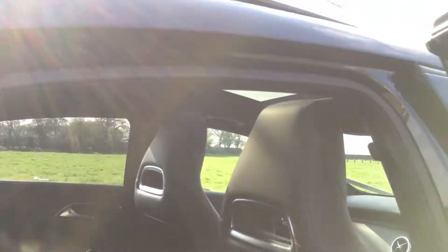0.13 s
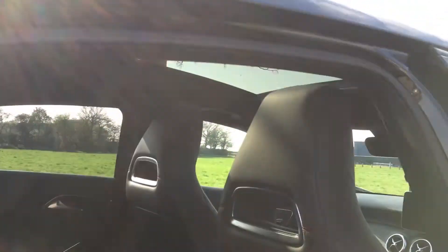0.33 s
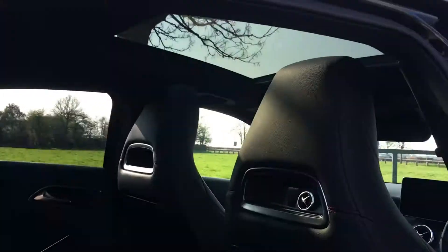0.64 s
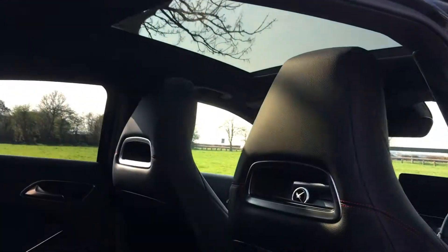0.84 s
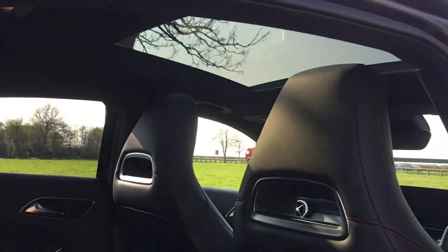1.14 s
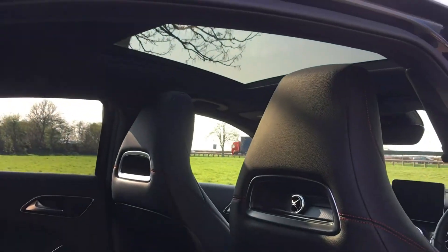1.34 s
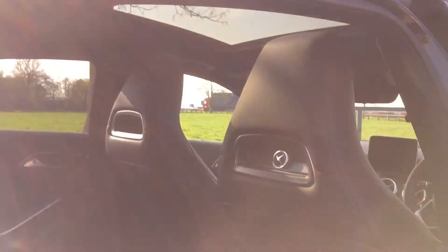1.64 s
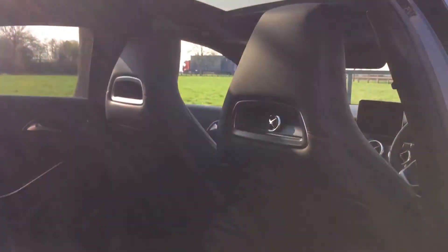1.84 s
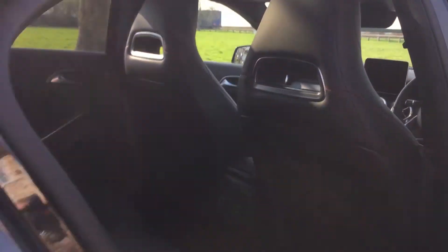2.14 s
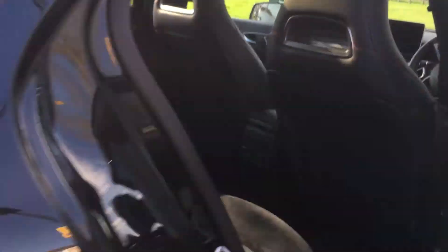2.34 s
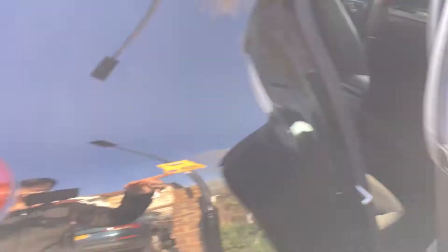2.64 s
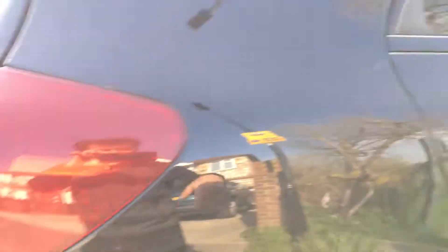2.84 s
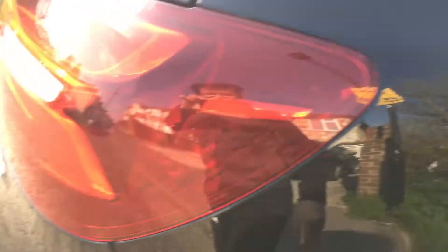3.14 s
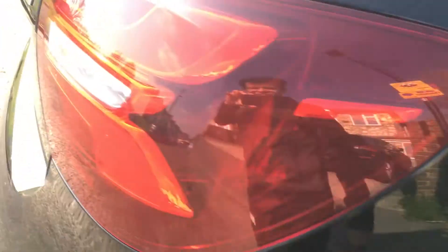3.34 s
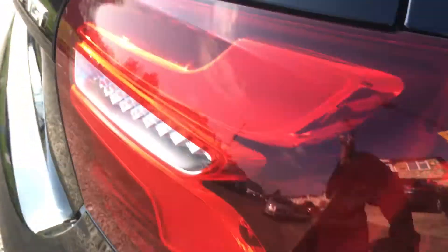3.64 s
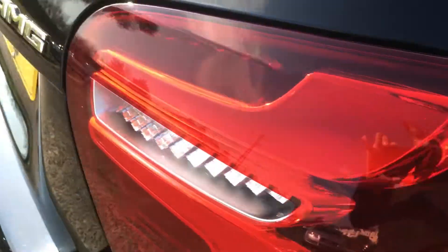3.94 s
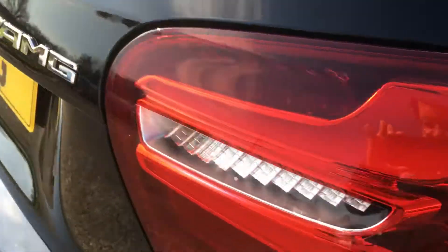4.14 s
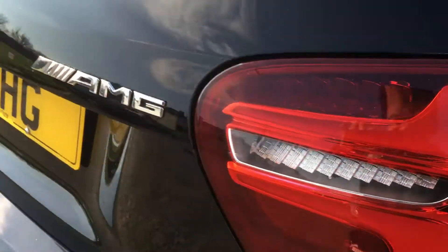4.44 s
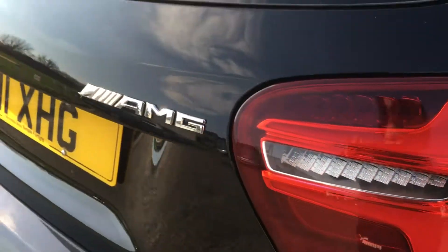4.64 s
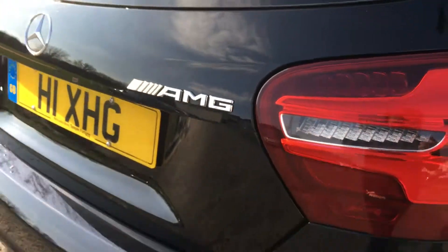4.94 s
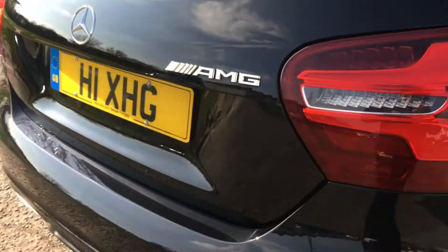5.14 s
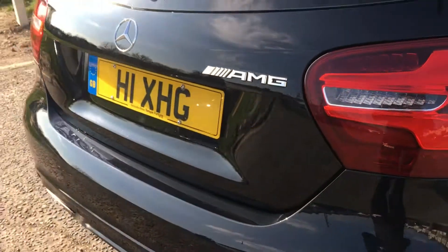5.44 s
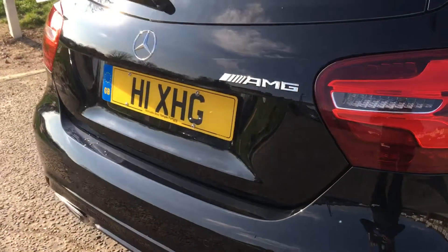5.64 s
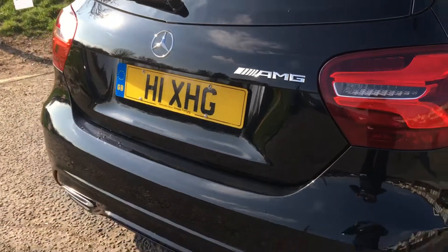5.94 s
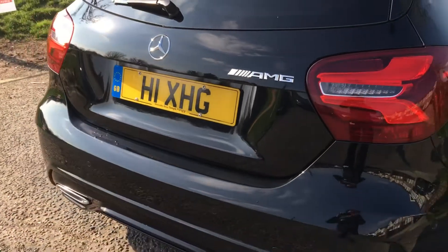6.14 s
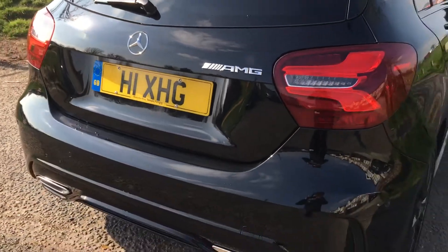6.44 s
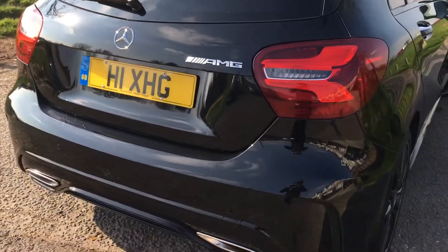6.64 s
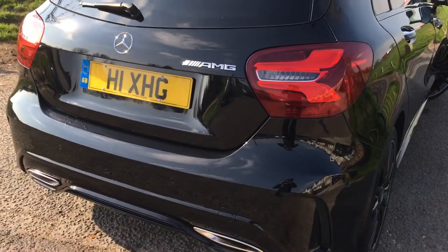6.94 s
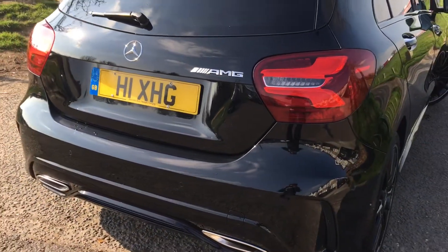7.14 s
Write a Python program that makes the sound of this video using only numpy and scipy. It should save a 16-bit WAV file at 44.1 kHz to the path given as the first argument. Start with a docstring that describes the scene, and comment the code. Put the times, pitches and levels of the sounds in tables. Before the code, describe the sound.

Outdoors near a main road, low traffic rumble and engine hum run throughout. A bird chirps briefly and tiny dry ticks sound. Nearly three seconds in, a car door shuts hard at arm's length, with a deep thud, steel latch crack and short trim rattle. Faint high squeals and small metal clinks follow. Hand-held microphone, slight hiss.

```python
"""Car door slam by a main road

A car door swings shut an arm's length from a hand-held microphone: shaped pushes ring its skin and cabin,
and noise bursts through steel resonances make the latch contacts and shaking trim. Shaped noise bands and
one engine order form the road; blurred sines form bird notes and squeals, such as distant brakes. Noise
makes a fine microphone hiss, swelling into soft rustles; noise bursts make dry ticks, damped modes clinks."""
import sys
import numpy as np
from scipy import signal
from scipy.fft import rfft, irfft, next_fast_len
from scipy.io import wavfile
from scipy.ndimage import uniform_filter1d, map_coordinates

SR = 44100
rng = np.random.default_rng(int(sys.argv[2]) if len(sys.argv) > 2 else 0)


def store_wav(level_fs):
    """Save 16-bit WAV to argv[1]."""
    pcm = np.round(np.clip(np.atleast_2d(level_fs), -1, 1) * 32767)
    wavfile.write(sys.argv[1], SR, pcm.T.astype(np.int16))


N = 321092

# Relative noise spectra of the road: freq_hz, density_db
RUMBLE_SPECTRUM = [(12, -47), (20, -15), (34, -4), (54, 3), (66, 3.5), (110, -12), (140, -41), (240, -120)]
ENGINE_SPECTRUM = [(53, -26), (90, -1.5), (118, -1), (178, -3.5), (210, -5), (221, -6.5), (241, -6.5),
                   (400, -31.5), (520, -50.5), (880, -120)]
DRUMMING_SPECTRUM = [(180, -12), (300, -4), (521, -9.5), (616, -6), (760, -13), (990, -38), (1670, -120)]
TYRE_SPECTRUM = [(410, -19.5), (700, -8), (1010, -1.5), (1220, -5.5), (1540, -6.5), (2800, -21.5),
                 (3640, -34), (6160, -120)]
FAR_HISS_SPECTRUM = [(1290, -12.5), (2200, -5), (2570, -8), (3520, -5.5), (4810, -16.5), (5790, -22.5),
                     (6070, -16.5), (8000, -32.5), (10400, -38), (17600, -120)]
# Relative noise spectrum shared by the microphone hiss and the soft rustles: freq_hz, density_db
FINE_SPECTRUM = [(2940, -32), (5000, -8.5), (5740, 0.5), (6280, -6), (6560, -4.5), (8610, -8.5), (9320, -4),
                 (10200, -9), (14500, -2.5), (16100, -10.5), (16300, -18.5)]
# Relative noise spectrum of the shaking trim: freq_hz, density_db
TRIM_SPECTRUM = [(300, 0.5), (650, -9), (1300, -10.5), (2800, -21.5), (6000, -23.5), (12500, -31.5),
                 (16300, -33)]
# Decay of the shaking trim: freq_hz, t60_s
TRIM_DECAY = [(100, 0.2), (400, 0.21), (1500, 0.19), (4000, 0.12), (9000, .12), (16000, 0.15)]
# Traffic drawing slowly nearer: time_s, tyre_roar_db, far_hiss_db, road_drumming_db
TRAFFIC_LEVELS = [(0, -50.5, -66, -53), (.45, -49.5, -66.5, -53.5), (1.2, -52.5, -64, -54.5),
                  (1.9, -49, -64.5, -55), (2.45, -48.5, -63.5, -56), (2.65, -49, -57.5, -54),
                  (2.87, -47, -57, -54), (3.2, -48.5, -59.5, -53.5), (3.65, -48.5, -60.5, -52),
                  (4.05, -48, -61.5, -55), (4.35, -48, -59, -50.5), (5, -47, -60, -55.5),
                  (5.7, -45.5, -61.5, -55.5), (6.3, -45, -61, -55), (6.9, -45, -57.5, -57.5),
                  (7.28, -45.5, -57.5, -52.5)]
# Heavy vehicles coming and going: time_s, rumble_db, engines_db
HEAVY_LEVELS = [(0, -33.5, -38.5), (.43, -33, -42), (.75, -41.5, -39), (1.2, -39.5, -39.5),
                (1.45, -34, -37.5), (1.85, -32.5, -38), (2.5, -30, -34.5), (2.8, -35, -40.5),
                (3.3, -32.5, -33.5), (3.8, -32, -36.5), (4.4, -37.5, -37.5), (4.7, -37, -36.5),
                (5, -32.5, -37), (5.4, -32, -37.5), (6.1, -38.5, -38), (6.6, -30, -39.5),
                (6.9, -32.5, -34.5), (7.28, -30.5, -37)]
# Level of the steady engine order: time_s, level_db
DRONE_LEVELS = [(0, -45.5), (.3, -40.5), (.8, -55), (1.3, -54), (1.55, -39.5), (1.95, -30.5), (2.25, -46.5),
                (2.55, -41), (3.1, -57), (3.3, -45.5), (3.57, -33), (3.8, -50.5), (4.5, -44), (4.8, -39),
                (5.2, -56), (5.45, -36), (5.72, -43.5), (5.95, -54), (7.28, -48)]
# Soft rustles as clothes brush: centre_s, width_s, level_db
BRUSH_SWELLS = [(.82, 0.066, -70), (1.74, .08, -74), (2.62, .08, -65.5), (2.85, 0.72, -69),
                (3.28, 0.24, -64.5), (4.42, .1, -68), (6.48, .06, -72), (5.15, .06, -69), (5.51, .07, -71),
                (7.222, .05, -62)]
# Long faint squeals: start_s, length_s, first_hz, middle_hz, last_hz, level_db, loudest_share (0-1 of length)
SQUEALS_HEARD = [(.05, 0.18, 8250, 8500, 8480, -78, .8), (.05, 0.87, 5640, 5610, 5640, -79, .85),
                 (2.7, 0.22, 6190, 6270, 6200, -70, 0.7), (2.802, .11, 5050, 5150, 5220, -64, .8),
                 (3.038, 1.08, 5830, 5650, 5660, -62, 0.8), (3.158, 0.99, 5620, 5530, 5520, -59, 0.87),
                 (4.098, 0.58, 5650, 5650, 5660, -62.5, 0.23), (4.67, .35, 9170, 9100, 9000, -72, .3),
                 (4.95, 2.2, 9000, 8985, 9020, -72, .35), (4.75, 2.43, 8500, 8450, 8440, -75, .4),
                 (6.2, .98, 8540, 8560, 8570, -71, .75), (5.2, 1.97, 9770, 9745, 9760, -77, .35),
                 (5.55, 1.46, 5900, 5860, 5840, -72, 0.25)]
# Bird notes, one sub-table each: time_s, pitch_hz, level_db
BIRD_NOTES = [
    [(.29, 2470, -64), (.308, 3050, -58), (.334, 3020, -63), (.343, 2900, -57), (.354, 2350, -64)],
    [(.35, 3130, -63), (.4, 3140, -67)],
    [(.39, 8000, -80), (.412, 8080, -70), (.458, 7960, -72), (.49, 7100, -72), (.51, 6650, -61),
     (.534, 6260, -75), (.58, 6200, -78)],
    [(.5, 6950, -75), (.57, 6940, -76)],
    [(.59, 5940, -76), (.645, 5970, -63), (.68, 5950, -59), (.7, 5760, -70), (.715, 5650, -72)],
    [(.9, 4550, -74), (.96, 4350, -74), (1.02, 4250, -74)],
    [(1.1, 4230, -76), (1.2, 4120, -76)],
    [(6.93, 4850, -76), (6.97, 4840, -63), (7.03, 4850, -60), (7.15, 4820, -78)],
]
# Dry ticks: start_s, level_db, centre_hz, knock_db, t60_s
DRY_TICKS = [(.2967, -52, 13600, 8, .018), (.325, -49, 7000, 26, 0.042), (0.333, -49, 7500, 27.5, .028),
             (.6424, -49, 13400, 8, .015), (0.677, -40, 13900, 6, 0.017), (.7996, -47, 15000, 4, .015),
             (.8265, -46, 13700, 12, .015), (.9603, -42, 11700, 2, 0.028), (0.9896, -46, 12200, 6, 0.016),
             (1.0256, -53, 13800, 6, .015), (1.7699, -48, 9180, 8, 0.017), (2.314, -44.5, 14500, 18, 0.028),
             (2.5272, -49, 13500, 14, 0.016), (2.6209, -41, 11000, 10, 0.017),
             (2.6344, -42, 14200, 3, 0.014), (3.8062, -45, 12100, 14, 0.012),
             (3.9017, -46, 13000, 15, 0.016), (4.3742, -30, 10000, 8, 0.0068),
             (4.3856, -38, 12500, 10, 0.012), (4.457, -48, 11200, 14, 0.014),
             (7.1865, -38, 8760, 11, 0.0072), (7.1924, -44, 12700, 11, .01), (7.214, -37, 6800, 10, .01),
             (7.2165, -35, 15500, 10, 0.01), (7.2224, -41, 14500, 10, .015), (7.249, -36, 14500, 12, 0.01),
             (7.2544, -42, 14400, 8, .02)]
# Pushes into the door: start_s, skin_db, cabin_db, cabin_tilt_db_per_octave, contact_s
DOOR_PUSHES = [(2.482, -29.5, -42, 9, 0.0019), (2.498, -27, -41, 4, 0.0018),
               (2.9182, -16, -32, -4, 0.00045), (2.928, -19, -30, -5, 0.00089),
               (2.9334, -1.5, -30, -2.5, 0.0015), (2.9402, -23, -4, -5.5, 0.0044),
               (2.946, -14, -23, -16, 0.0032), (2.966, -28, -14, 4.5, 0.0016),
               (2.9762, -18, -17.5, 7, 0.0024)]
# Modes of the door skin, short and high, and of the shut cabin below it: freq_hz, level_db, t60_s
SKIN_MODES = [(221, 3.5, 0.054), (250, 2, 0.085), (386, -5, 0.058), (594, -4, 0.064), (780, -7, 0.032),
              (1030, -12, 0.11), (1190, -7.5, 0.16), (1700, -17, 0.087), (1940, -22, 0.052),
              (2720, -19, 0.077), (3150, -12, .05), (4190, -21, .05)]
CABIN_MODES = [(53.5, 3, 0.26), (79.6, -1.5, 0.14), (120, -4.5, 0.22), (162.3, -4.5, 0.29)]
# Metal contacts of latch and striker: start_s, level_db, t60_s, tilt_db_per_octave, rise_s
LATCH_CONTACTS = [(2.9178, -17, 0.011, -18, .0015), (2.9223, -10, 0.013, -8, 0.00105),
                  (2.927, -17, 0.015, -12, 0.0014), (2.9337, 0.5, 0.011, -5.5, 0.0011),
                  (2.9433, -10, 0.014, -2, 0.0012), (2.964, -18.5, 0.036, -8, 0.0017)]
# Resonances of the latch steel: centre_hz, width_hz, level_db
STEEL_RESONANCES = [(754, 105, 12.5), (1287, 68, 11), (2074, 200, 9), (3290, 500, 4), (4030, 270, 8.5),
                    (5560, 650, 2), (8370, 1900, -6), (12100, 1100, 0)]
# Clinks of small metal parts: start_s, level_db, tilt_db_per_octave, pitch_ratio
METAL_CLINKS = [(3.5063, -34, 0.5, 0.98), (3.5224, -55.5, 3.5, 0.96), (3.5364, -65, 2, .98),
                (4.2822, -59, -3, 1.001), (4.3095, -45, 1, 0.905), (4.318, -65, 7, 0.97),
                (4.3234, -54, -1, 1.001)]
# Modes of the small metal parts before pitch ratio and scatter: freq_hz, level_db, t60_s
METAL_MODES = [(2600, -9, .008), (4600, 1, 0.01), (6220, 1.5, 0.02), (7420, 7, 0.016), (8800, -2, .02),
               (10700, -7, 0.018), (11540, -4, 0.049), (12200, 2, 0.023), (14700, -10, .02),
               (15200, -6, .02)]

DRONE_HZ = 210.4
MICROPHONE_HISS_DB = -71.5
SQUEAL_ENDS_DB = -6  # relative to the loudest moment of a squeal
TRIM_OVER_CRACK_DB = 5
# Gain control: threshold, share of the excess taken off, fall of the held peak level
DUCK_FROM_DB, DUCK_SHARE, PEAK_FALL_DB_PER_S = -12.5, 0.22, 44
BAND_LIMIT_HZ = 16100


def amp(db):
    """Decibel law: the amplitude factor of a level in dB."""
    return 10 ** (np.asarray(db) / 20)


def unit(x):
    """Normalisation: x scaled to an rms of 1."""
    return x / np.sqrt(np.mean(x ** 2) + 1e-20)


def along(points, hz):
    """Interpolation of (frequency, value) points on a logarithmic frequency axis."""
    point_hz, values = np.transpose(points)
    return np.interp(np.log(hz + 1), np.log(point_hz + 1), values)


def curves(rows):
    """Linear interpolation in time: one curve for each column after the time."""
    times, *columns = np.transpose(rows)
    return [np.interp(np.arange(N) / SR, times, column) for column in columns]


def wobble(rate, size=N):
    """Slow random fluctuation: a smooth curve through rate random knots a second."""
    knots = rng.standard_normal(int(size * rate / SR) + 4)
    return map_coordinates(knots, [np.arange(size) * rate / SR])


def swells(rows, rest_db):
    """Power addition: bell-shaped swells over a resting level, in dB."""
    t = np.arange(N) / SR
    power = amp(2 * rest_db)
    for centre, width, db in rows:
        power = power + amp(2 * db) * np.exp(-(2 * (t - centre) / width) ** 4)
    return 10 * np.log10(power)


def filtered(x, response):
    """Linear filtering: the spectrum of x times a complex response of frequency."""
    size = next_fast_len(len(x) + SR // 2)
    spectrum = rfft(x, size) * response(np.fft.rfftfreq(size, 1 / SR))
    return irfft(spectrum, size)[:len(x)]


def add(track, start, sound):
    """Superposition: mix a sound into the track at start seconds."""
    part = track[round(start * SR):][:len(sound)]
    part += sound[:len(part)]


def rush(spectrum, patchy_db):
    """Shaped random noise of rms 1, with random gain patches over time and frequency."""
    grid = signal.stft(rng.standard_normal(N), nperseg=512)[2]
    patches = uniform_filter1d(rng.standard_normal(grid.shape), size=6, axis=0)
    patches = uniform_filter1d(patches, size=14, axis=1)
    noise = signal.istft(grid * amp(patchy_db * unit(patches)), nperseg=512)[1][:N]
    return unit(filtered(noise, lambda hz: amp(along(spectrum, hz))))


def line(start, hz, db, steady, width_hz, fade_s=0.0077):
    """Multipath blurring: many shifting paths spread a tone into narrow noise; it fades at its ends."""
    t = np.arange(len(hz)) / SR
    phase = 2 * np.pi * np.cumsum(hz) / SR
    blur = [unit(filtered(noise, lambda f: 1 / (1 + (2 * f / width_hz) ** 2)))
            for noise in rng.standard_normal((2, len(t)))]
    tone = unit((steady + blur[0]) * np.sin(phase) + blur[1] * np.cos(phase))
    fade = np.clip(np.minimum(t, t[-1] - t) / fade_s, 0, 1)
    out = np.zeros(N)
    add(out, start, fade * amp(db) * tone)
    return out


def ringing(modes, tilt_db=0):
    """Modal superposition: half a second of damped modes, neighbours moving in opposite directions."""
    t = np.arange(SR // 2) / SR
    out = np.zeros(len(t))
    for k, (hz, db, t60) in enumerate(modes):
        tilted_db = db + tilt_db * np.log2(hz / modes[0][0])
        out += (-1) ** k * amp(tilted_db - 60 * t / t60) * np.sin(2 * np.pi * hz * t)
    return out


def road():
    """Incoherent summation: many vehicles blur into noise bands, and one engine order stands out."""
    tyres_db, hiss_db, drumming_db = curves(TRAFFIC_LEVELS)
    rumble_db, engines_db = curves(HEAVY_LEVELS)
    rumble = amp(rumble_db + 1.9 * wobble(8.6)) * rush(RUMBLE_SPECTRUM, patchy_db=0.7)
    engines = amp(engines_db + 0.94 * wobble(6.5)) * rush(ENGINE_SPECTRUM, patchy_db=3.5)
    drumming = amp(drumming_db + 1.4 * wobble(6.7)) * rush(DRUMMING_SPECTRUM, patchy_db=0.7)
    tyres = amp(tyres_db + 0.98 * wobble(4.6)) * rush(TYRE_SPECTRUM, patchy_db=1.1)
    far_hiss = amp(hiss_db + 0.98 * wobble(7)) * rush(FAR_HISS_SPECTRUM, patchy_db=2.0)
    drone = line(0, np.full(N, DRONE_HZ), curves(DRONE_LEVELS)[0], steady=1.04, width_hz=7.2)
    return rumble + engines + drumming + tyres + far_hiss + drone


def microphone_hiss_and_rustles():
    """Noise-power addition: a steady fine microphone hiss, with soft rustles over it as clothes brush."""
    level_db = swells(BRUSH_SWELLS, MICROPHONE_HISS_DB) + 0.7 * wobble(30)
    return amp(level_db) * rush(FINE_SPECTRUM, patchy_db=0.3)


def squeal(start, length, first_hz, middle_hz, last_hz, db, loudest):
    """Frequency gliding: pitch follows a parabola; the level climbs, sinks again and flutters."""
    share = np.linspace(0, 1, round(length * SR))
    hz = np.polyval(np.polyfit([0, 0.5, 1], [first_hz, middle_hz, last_hz], deg=2), share)
    swell_db = np.interp(share, [0, loudest, 1], [SQUEAL_ENDS_DB, 0, SQUEAL_ENDS_DB])
    level_db = db + swell_db + 2.15 * wobble(25, size=len(share))
    return line(start, hz, level_db, steady=0.71, width_hz=85, fade_s=0.039)


def squeals():
    """Narrow-band superposition: long faint squeals smeared by distance."""
    return sum(squeal(*row) for row in SQUEALS_HEARD)


def note(rows):
    """Frequency modulation: one bird note follows the pitch and level of its table."""
    start, end = rows[0][0], rows[-1][0]
    span = slice(round(start * SR), round(end * SR))
    hz, db = (curve[span] for curve in curves(rows))
    return line(start, hz, db, steady=2.6, width_hz=110)


def bird():
    """Reverberation: bird notes convolved with decaying noise gain a haze of echoes."""
    notes = sum(note(rows) for rows in BIRD_NOTES)
    t = np.arange(SR // 2) / SR
    echoes = rng.standard_normal(len(t)) * amp(-60 * t / 0.28)  # t60 of 0.28 s
    haze = signal.fftconvolve(notes, echoes / np.linalg.norm(echoes))[:N]
    return notes + amp(-7) * haze


def ticks():
    """Impulsive excitation: each tick is a short bright burst with a dull knock."""
    def hump(hz, top_hz, octaves):
        """Resonance envelope: a bell on a logarithmic frequency axis."""
        return np.exp(-(np.log2((hz + 1) / top_hz) / octaves) ** 2)

    out = np.zeros(N)
    t = np.arange(SR // 10) / SR
    for start, db, centre_hz, knock_db, t60 in DRY_TICKS:
        burst = rng.standard_normal(len(t)) * amp(-60 * t / t60) * (1 - np.exp(-t / 0.0013))
        burst[40] += 1.1 * np.sqrt(0.017 / t60) ** 3  # the shorter the tick, the more it is one snap
        colour = lambda hz: hump(hz, centre_hz, 1.0) + amp(knock_db) * hump(hz, 1650, 0.7)
        add(out, start, amp(db) * filtered(burst, colour))
    return out


def door_body():
    """Forced vibration: rounded pushes ring the door skin and the shut cabin."""
    skin = ringing(SKIN_MODES)
    out = np.zeros(N)
    for start, skin_db, cabin_db, tilt_db, contact in DOOR_PUSHES:
        push = np.hanning(round(contact * SR) + 3)  # a longer contact gives a duller thud
        body = amp(skin_db) * skin + amp(cabin_db) * ringing(CABIN_MODES, tilt_db)
        add(out, start, np.convolve(body, push / push.sum()))
    return out


def steel(hz):
    """Resonant transmission: a high-pass path plus the resonances of the latch steel."""
    response = hz / (hz + 900)
    for centre, width, db in STEEL_RESONANCES:
        damping = 1j * hz * width
        response = response + amp(db) * damping / (centre ** 2 - hz ** 2 + damping)
    return response


def shaking_trim():
    """Frequency-dependent damping: loose trim is noise whose bands die away at their own rates."""
    hz, frame_s, grid = signal.stft(rng.standard_normal(SR // 2), SR, nperseg=128)
    decay_db = 60 * frame_s / along(TRIM_DECAY, hz)[:, None]
    level_db = along(TRIM_SPECTRUM, hz)[:, None] - decay_db
    return signal.istft(grid * amp(level_db), SR, nperseg=128)[1]


def latch():
    """Impact excitation: each metal contact cracks through the steel and sets the trim shaking."""
    out = np.zeros(N)
    t = np.arange(SR // 2) / SR
    for start, db, t60, tilt_db, rise in LATCH_CONTACTS:
        crack = rng.standard_normal(len(t)) * amp(-60 * (t / t60) ** 1.35) * (1 - np.exp(-t / rise))
        # the tilt is level below 1500 Hz
        colour = lambda hz: amp(tilt_db * np.log2(np.maximum(hz, 1500) / 3000)) * steel(hz)
        add(out, start, amp(db) * filtered(crack, colour))
        add(out, start, amp(db + TRIM_OVER_CRACK_DB) * shaking_trim())
    return out


def clinks():
    """Modal ringing under random amplitude modulation: loose metal parts chatter as they ring."""
    out = np.zeros(N)
    t = np.arange(SR // 2) / SR
    for start, db, tilt_db, ratio in METAL_CLINKS:
        chatter = uniform_filter1d(rng.standard_normal(len(t)), size=30) * np.sqrt(30)
        rattle = amp(3.5 * chatter) * (1 - np.exp(-t / 0.0006))
        modes = [(hz * ratio * rng.normal(1, 0.008), level_db + rng.normal(0, 1.2), t60)
                 for hz, level_db, t60 in METAL_MODES]
        add(out, start, amp(db) * rattle * ringing(modes, tilt_db))
    return out


def scene():
    """Superposition of road, microphone hiss and rustles, whistles, ticks, door and clinks."""
    ambience = road() + microphone_hiss_and_rustles() + squeals() + bird()
    close = ticks() + door_body() + latch() + clinks()
    return (ambience + close)[None]


def record(dry):
    """Nonlinear reception: deep bass is cut, loud peaks duck the gain, and the signal saturates in a band."""
    thin = filtered(dry[0], lambda hz: (1j * hz / (1j * hz + 24)) ** 4)
    # hold each peak level while it falls at a constant rate
    fall_db = PEAK_FALL_DB_PER_S * np.arange(N) / SR
    peak_db = 20 * np.log10(np.abs(thin) + 1e-9)
    held_db = np.maximum.accumulate(peak_db + fall_db) - fall_db
    duck_db = DUCK_SHARE * np.maximum(held_db - DUCK_FROM_DB, 0)
    eased_db = signal.lfilter([0.001], [1, -0.999], duck_db)  # time constant of about 1000 samples
    ducked = thin * amp(-eased_db)
    soft = ducked / (1 + np.abs(ducked / 0.95) ** 6) ** (1 / 6)
    return filtered(soft, lambda hz: np.clip((BAND_LIMIT_HZ - hz) / 200, 0, 1) ** 2)[None]


dry = scene()
out = record(dry)
store_wav(out)
```